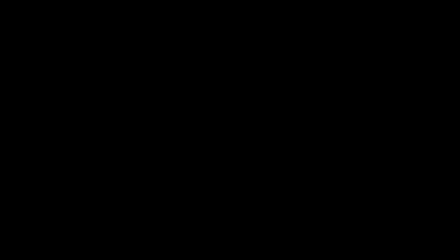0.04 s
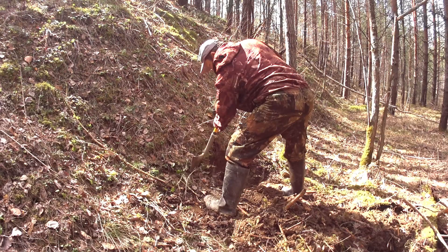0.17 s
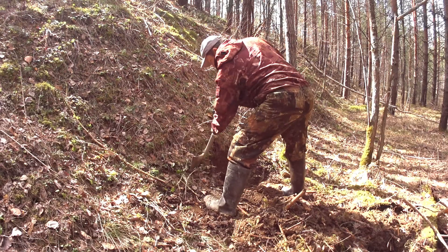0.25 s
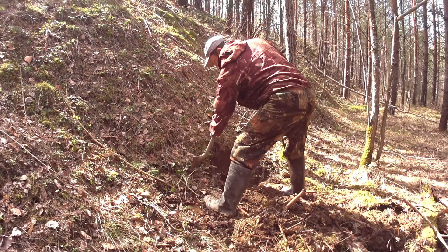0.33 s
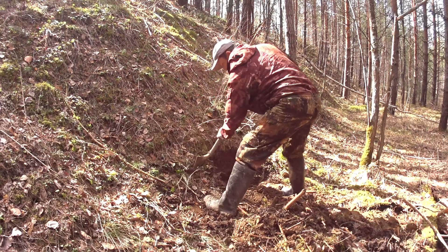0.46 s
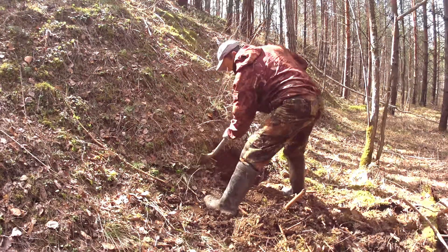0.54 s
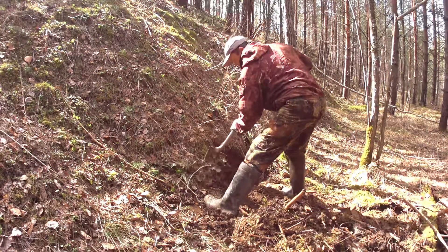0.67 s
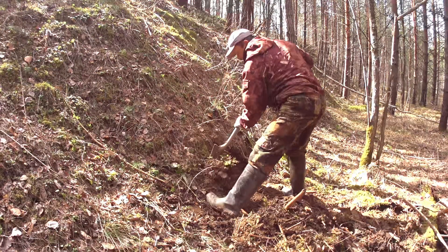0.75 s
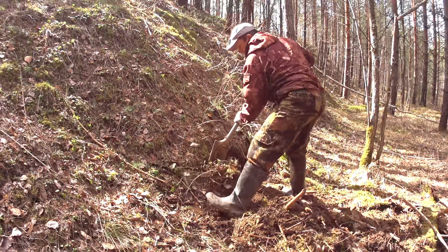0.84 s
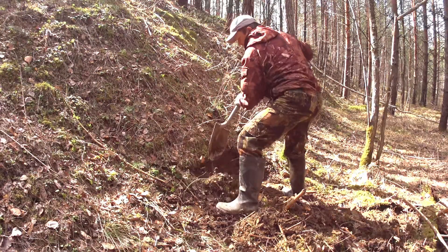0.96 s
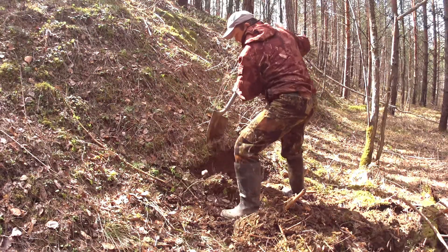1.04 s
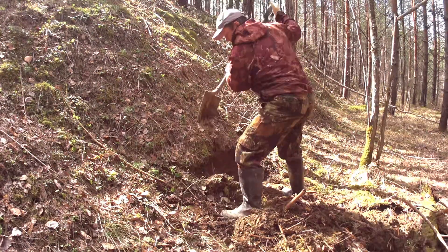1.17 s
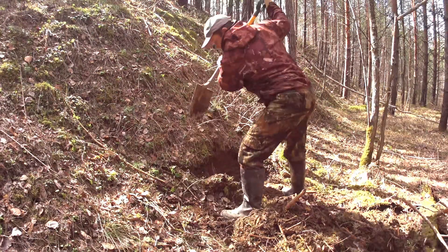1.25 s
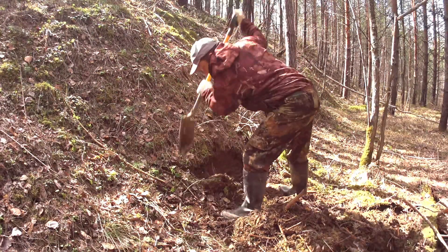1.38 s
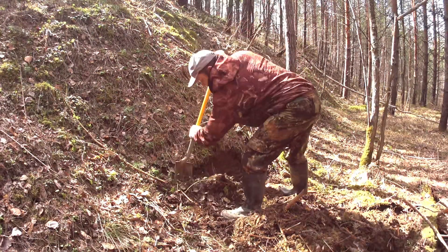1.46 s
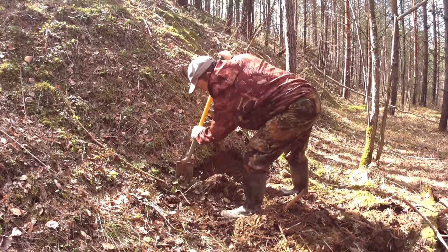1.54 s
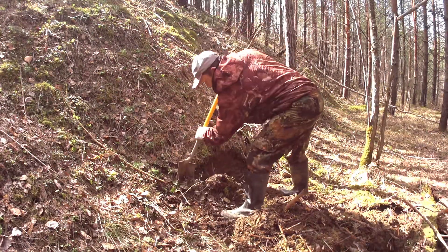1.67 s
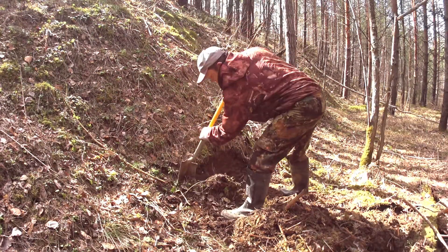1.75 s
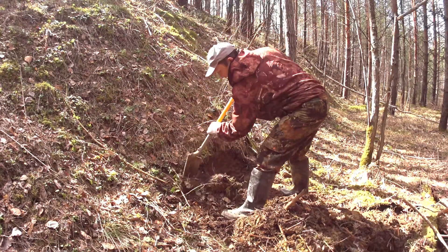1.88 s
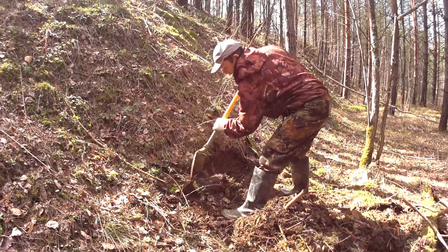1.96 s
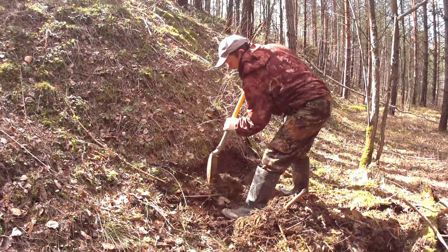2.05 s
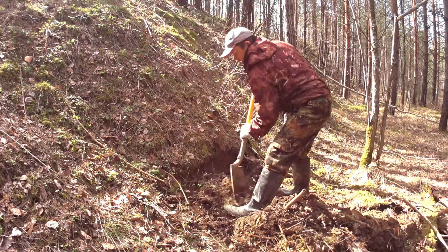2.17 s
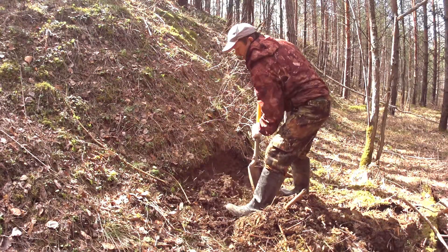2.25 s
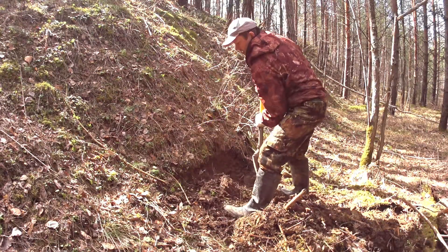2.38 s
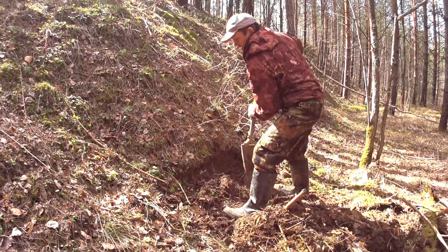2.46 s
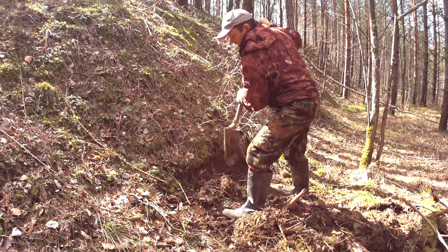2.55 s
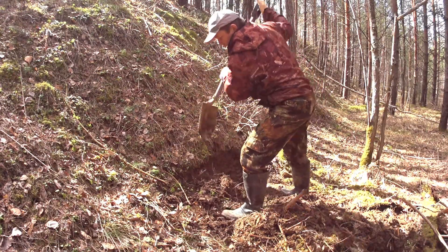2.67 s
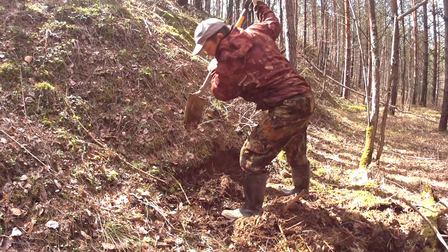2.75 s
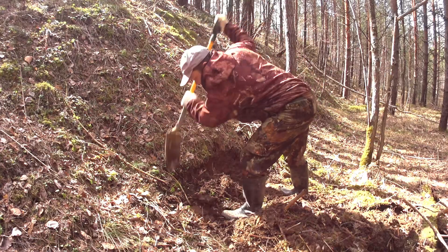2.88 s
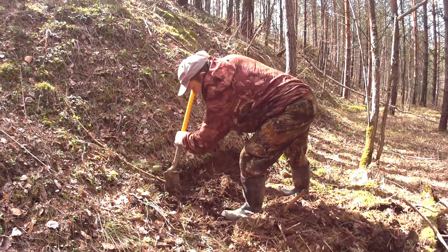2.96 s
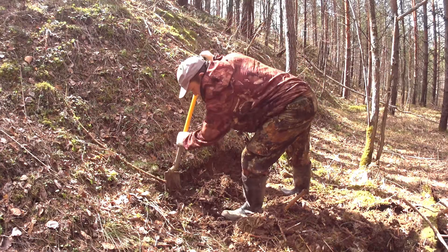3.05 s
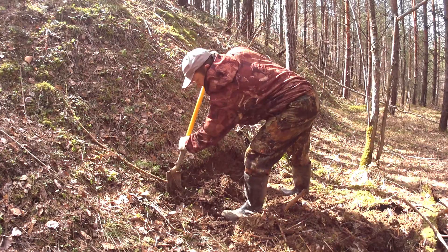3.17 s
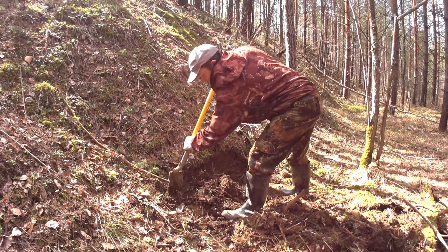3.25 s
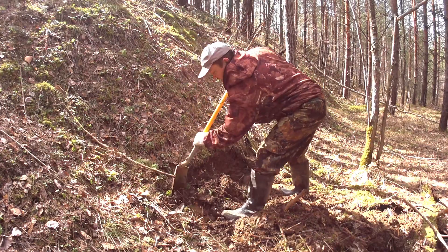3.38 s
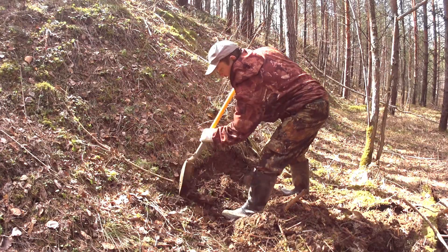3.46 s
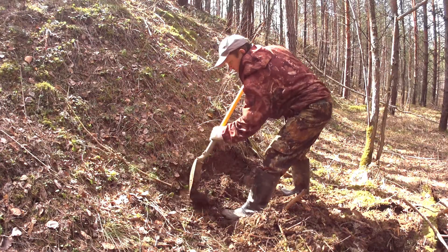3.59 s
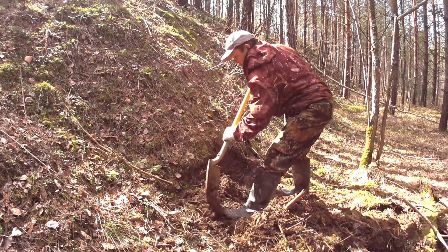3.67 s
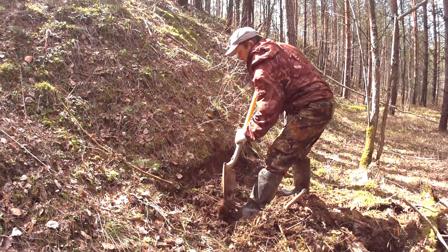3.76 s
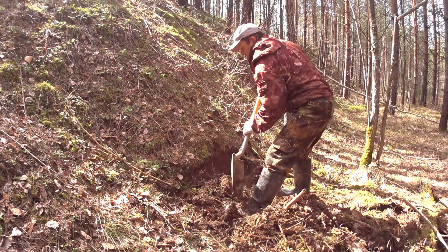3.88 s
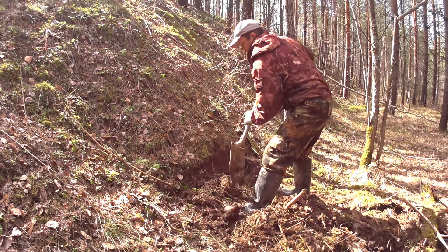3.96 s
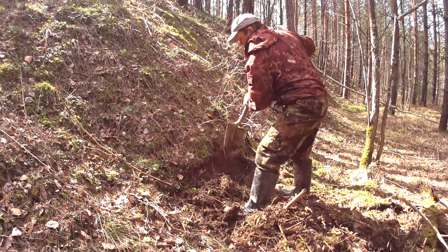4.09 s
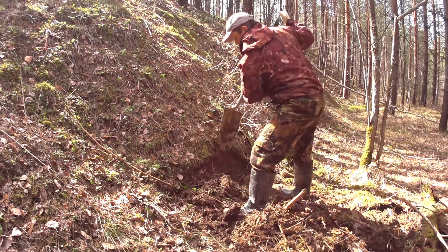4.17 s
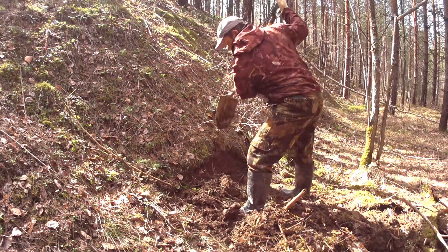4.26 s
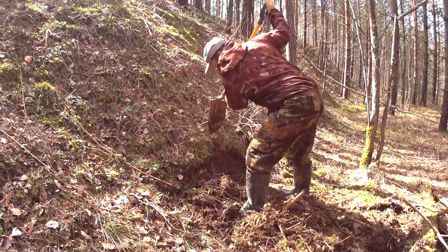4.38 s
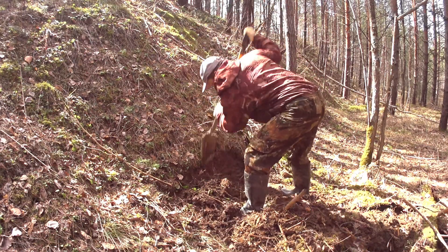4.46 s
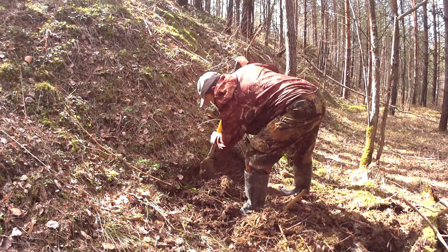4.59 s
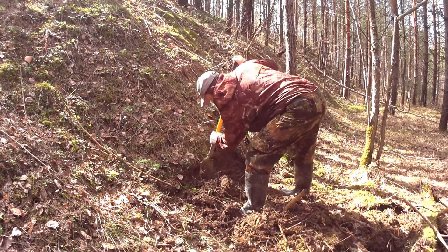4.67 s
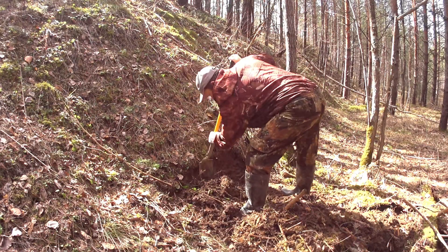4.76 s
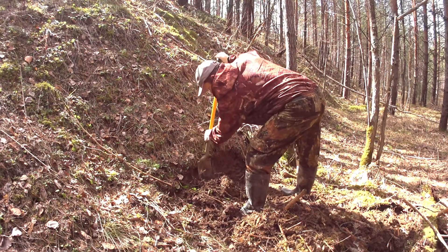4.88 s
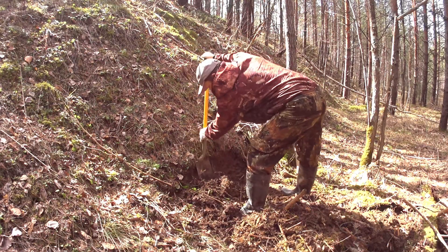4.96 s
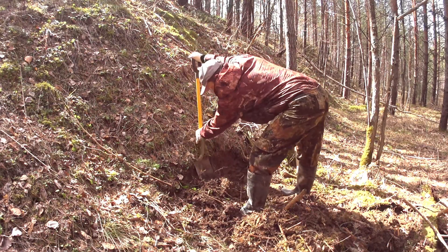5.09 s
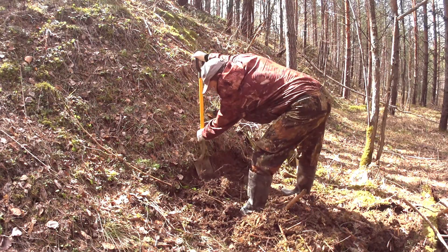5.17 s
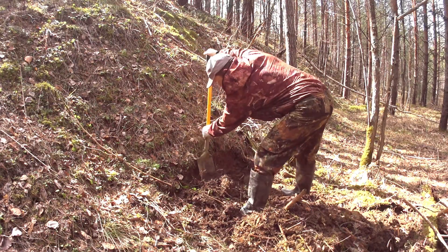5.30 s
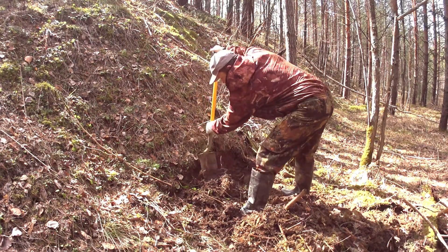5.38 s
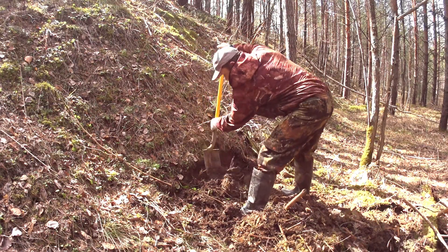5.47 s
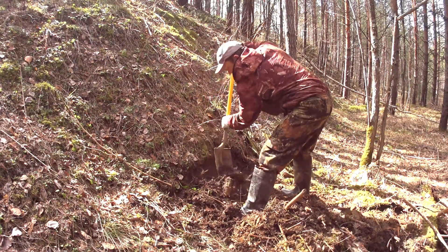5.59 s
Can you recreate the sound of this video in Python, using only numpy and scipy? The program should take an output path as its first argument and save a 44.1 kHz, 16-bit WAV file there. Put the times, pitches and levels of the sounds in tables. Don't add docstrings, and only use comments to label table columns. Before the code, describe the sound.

Three crunching, cracking shovel blows in clay soil, slightly ringing steel, trickling dirt and knocking stones, then a faint distant bird trill.

```python
import sys
import numpy as np
from scipy import signal
from scipy.fft import rfft, irfft
from scipy.io import wavfile

SR = 44100
rng = np.random.default_rng(int(sys.argv[2]) if len(sys.argv) > 2 else 0)


def convert_level_to_amplitude(level_db):
    exponent = np.asarray(level_db, float) / 20
    return 10 ** exponent


def master_out(mix):
    frames = np.transpose(np.atleast_2d(mix))
    ceiling = np.clip(frames, -1, 1)
    pcm = np.round(ceiling * 32767).astype(np.int16)
    wavfile.write(sys.argv[1], SR, pcm)


N = 248283

# (time [s], force [dB], depth [dB]); depth darkens the crunch
CHOPS = [
    [(1.385, -47, -7.5), (1.408, -27.5, 3), (1.4175, -24.5, 0), (1.4205, -19, 0.5), (1.434, -22.5, 1.5),
     (1.442, -32.5, 1.5), (1.47, -57.5, -13)],
    [(2.877, -29.5, -1), (2.893, -28, -2.5), (2.9, -25, -4), (2.905, -19, 7), (2.917, -20, 5.5),
     (2.928, -34.5, -2), (2.95, -42, 0)],
    [(4.463, -47, 7), (4.4695, -35, -5), (4.4705, -15.5, -5.5), (4.48, -25.5, -0.5), (4.492, -27.5, 2),
     (4.5, -40, 3), (4.53, -58, 3)],
]
# (frequency [Hz], level [dB per Hz])
SOIL_SPECTRUM = [(35, -92), (60, -41.5), (261, -31.5), (362, -19), (481, -18.5), (714, -18), (1440, -10.5),
                 (2180, -11), (3950, 3), (5730, -10), (10600, -17.5), (11300, -17), (14700, -74),
                 (22000, -120)]


def rms_one(x):
    return x / np.sqrt(np.mean(x ** 2) + 1e-20)


def peak_one(x):
    return x / np.abs(x).max()


def filtered(x, order, hz, kind):
    return signal.sosfilt(signal.butter(order, hz, kind, fs=SR, output="sos"), x)


def in_time(rows):
    s, *columns = np.transpose(rows)
    return [np.interp(np.arange(N) / SR, s, c) for c in columns]


def colour(x, spectrum):
    hz, db = np.transpose(spectrum)
    bin_hz = np.arange(1025) * SR / 2048
    gain_db = np.interp(np.log(bin_hz + 1), np.log(hz), np.maximum(db, -70))
    cepstrum = irfft(np.log(convert_level_to_amplitude(gain_db)))
    cepstrum[1:1024] *= 2
    cepstrum[1025:] = 0
    impulse = irfft(np.exp(rfft(cepstrum)))
    return signal.fftconvolve(x, impulse[None], axes=1)[:, :N]


def drift(rate_hz):
    r = np.exp(-2 * np.pi * rate_hz / SR)
    slow = signal.lfilter([1], [1, -2 * r, r * r], rng.standard_normal(N + 9000))
    return rms_one(slow[9000:])


def ring(clicks, hz, t60_s):
    r, w = convert_level_to_amplitude(-60 / (t60_s * SR)), 2 * np.pi * hz / SR
    return signal.lfilter([0, np.sin(w)], [1, -2 * r * np.cos(w), r * r], clicks + 1e-18)


def add(out, s, sound):
    i = round(s * SR)
    out[i:i + len(sound)] += sound[:N - i]


def widen(mono, twin):
    side_db = -15.5
    return mono + convert_level_to_amplitude(side_db) * twin * np.array([[1], [-1]])


def trunks(x, t60_s):
    t = np.arange(SR // 2) / SR
    tail = rng.standard_normal((2, len(t))) * convert_level_to_amplitude(-60 * t / t60_s) * (1 - np.exp(-t / 0.0011))
    tail = tail[0] + .5 * tail[1] * np.array([[1], [-1]])
    tail = tail / np.sqrt(np.sum(tail[0] ** 2))
    return signal.fftconvolve(x[None], tail, axes=1)[:, :N]


def woods():
    # (frequency [Hz], level [dB per Hz])
    woods_spectrum = [(12, -76), (20, -32), (154, -19), (223, -11.5), (422, -4), (596, -3.5), (717, -4),
                      (819, -5), (1390, -9.5), (1670, -9.5), (2070, -9.5), (3080, -17), (11300, -21.5),
                      (14700, -49), (22000, -120)]
    level_db, likeness = -60, 0.057
    mid, side = rms_one(colour(rng.standard_normal((2, N)), woods_spectrum))
    pair = np.sqrt(1 + likeness) * mid + np.sqrt(1 - likeness) * side * [[1], [-1]]
    return convert_level_to_amplitude(level_db - 5.0 + 1.16 * drift(11.8)) * pair


def whistle(pitch_hz):
    return np.hanning(len(pitch_hz)) ** .5 * np.sin(2 * np.pi * np.cumsum(pitch_hz) / SR)


def bird():
    # (time [s], level [dB], warble depth [Hz]); the note sags as deep as it warbles
    syllables = [
        (4.52, -56.5, 79.5),
        (4.64, -55, 102),
        (4.725, -47.5, 380),
        (4.915, -45.5, 380),
        (5.105, -44.5, 380),
        (5.295, -43.5, 380),
        (5.485, -40.5, 380),
    ]
    note_s, slur_s, slur_db = 0.165, .08, -14
    note_hz, warble_rate_hz, sag_per_s = 3900, 61.0, 5.0
    out, t, wobble = np.zeros(N), np.arange(round(note_s * SR)) / SR, drift(85.0)
    slur_len = round(slur_s * SR)
    for s, db, depth_hz in syllables:
        uneven = .3 * wobble[round(s * SR / 2):][:len(t)]
        slur_hz = np.linspace(5200., 4200., slur_len) + depth_hz * uneven[:slur_len]
        add(out, s, convert_level_to_amplitude(db + slur_db) * whistle(slur_hz))
        warble = np.sin(2 * np.pi * warble_rate_hz * t) + uneven - sag_per_s * t
        add(out, s + 0.037, convert_level_to_amplitude(db) * whistle(note_hz + depth_hz * warble))
    return trunks(out, .42)


def swishes():
    # (time [s], length [s], level [dB])
    strokes = [
        (0.408, 0.35, -52.5),
        (3.798, 0.2, -50.5),
    ]
    # (frequency [Hz], level [dB per Hz])
    cloth_spectrum = [(880, -62), (1500, -32), (2130, -8), (2320, -7), (2820, -11), (4650, -1),
                      (7750, -23.5), (9000, -26), (11700, -64), (19800, -120)]
    t = np.arange(N) / SR
    swell = sum(convert_level_to_amplitude(db) * np.sin(np.pi * np.clip((t - s) / length_s, 0, 1)) ** 0.59
                for s, length_s, db in strokes)
    return widen(*(swell * rms_one(colour(rng.standard_normal((2, N)), cloth_spectrum))))


def thuds():
    # (time [s], peak [dB], pitch [Hz], t60 [s])
    footfalls = [
        (.343, -42.5, 203, 0.045),
        (1.372, -45.5, 221, .031),
        (1.418, -27.5, 431, 0.055),
        (2.704, -46, 220, 0.032),
        (2.904, -28.5, 500, .059),
        (3.685, -36, 536, 0.061),
        (3.729, -40, 500, 0.041),
        (3.827, -43.5, 360, 0.039),
        (4.391, -43.5, 228, 0.043),
        (4.48, -42, 530, 0.11),
    ]
    out, t = np.zeros(N), np.arange(6000) / SR
    for (s, db, hz, t60_s), puff in zip(footfalls, rng.standard_normal((len(footfalls), 6000))):
        push = np.exp(-t / 0.00078) + 0.94 * puff * np.exp(-t / 0.003)
        upper = 0.4 * ring(push, 1.7 * hz, .25 * t60_s)
        lower = 0.3 * ring(push, 0.575 * hz, 0.57 * t60_s)
        add(out, s, convert_level_to_amplitude(db) * peak_one(np.diff(ring(push, hz, t60_s) + upper + lower)))
    return filtered(out, 3, 140, "high")


def burst_shape(t, contact_s):
    return t / contact_s * np.exp(1 - t / contact_s)


def snaps(rows, contact_s):
    # (pitch [Hz], t60 [s])
    lump_decay = [(1200, 0.016), (4200, 0.0091), (7500, 0.0039)]
    pitched, sharp, t = np.zeros((2, N)), np.zeros((2, N)), np.arange(2000) / SR
    for (s, db, hz, sharp_db), bursts in zip(rows, rng.standard_normal((len(rows), 2, 2000))):
        t60_s = np.clip(np.interp(hz, *np.transpose(lump_decay)), .0015, .016)
        for k, burst in enumerate(bursts * burst_shape(t, contact_s)):
            add(pitched[k], s + 0.0006, convert_level_to_amplitude(db) * peak_one(ring(np.diff(burst), hz, t60_s)))
            add(sharp[k], s + 0.00064, convert_level_to_amplitude(db + sharp_db) * peak_one(burst))
    return widen(*(pitched + convert_level_to_amplitude(10.5) * colour(sharp, SOIL_SPECTRUM)))


def scattered(rows, hz, sharp_db):
    chance = rng.standard_normal((len(rows), 2))
    return [(s, db, hz * (1 + .06 * a), sharp_db + 3.2 * b) for (s, db), (a, b) in zip(rows, chance)]


def leaves():
    # (time [s], peak [dB])
    leaf_ticks = [(.1433, -52), (.4536, -49), (.9076, -49), (.934, -45.5), (1.0747, -52), (1.2264, -47.5),
                  (3.0382, -50.5), (3.1245, -41), (3.1783, -41), (3.1983, -45), (3.3225, -40.5),
                  (3.5645, -45), (3.7281, -45), (4.0189, -56), (4.205, -50), (4.2733, -53), (4.4195, -49.5),
                  (4.947, -67), (4.9698, -58), (4.988, -53), (5.0262, -57), (5.4103, -61), (5.4343, -51)]
    return snaps(scattered(leaf_ticks, hz=7300, sharp_db=-13), contact_s=0.001)


def knocks():
    # (time [s], peak [dB], pitch [Hz], broad clack [dB])
    stones = [(1.156, -43, 1700, -5), (1.183, -33.5, 1770, -13), (1.546, -38, 2070, -22),
              (1.565, -50, 2140, -6), (2.032, -41.5, 1240, -4), (2.374, -45.5, 1950, 4),
              (2.705, -40.5, 660, -5), (2.804, -45.5, 1900, 7.5), (3.334, -47, 1840, -7),
              (3.376, -38, 1860, -3), (3.5, -43.5, 1230, -1), (3.661, -39, 1330, 6), (3.684, -43.5, 930, 2),
              (3.73, -40, 850, -4), (3.745, -44, 1610, 10), (3.825, -44.5, 830, 8), (3.86, -49.5, 2400, 0),
              (4.513, -29, 1220, -15), (4.716, -32.5, 1200, -13), (5.41, -38, 1330, -2.5)]
    out, t = np.zeros((2, N)), np.arange(3000) / SR
    for (s, db, hz, clack_db), bursts in zip(stones, rng.standard_normal((len(stones), 2, 3000))):
        for k, burst in enumerate(bursts * burst_shape(t, contact_s=0.0014)):
            ping = ring(burst, hz, .018)
            clack = np.diff(ring(burst, hz, .003) + ring(burst, 1.7 * hz, .002), prepend=0)
            add(out[k], s, convert_level_to_amplitude(db - 4.5) * (peak_one(ping) + convert_level_to_amplitude(clack_db) * peak_one(clack)))
    return widen(*filtered(out, 2, [450, 4500], "band"))


def soil(body_db, grit_db, dust_db, per_s, spread_db, clump_db, hiss_db):
    sizes = convert_level_to_amplitude(spread_db * np.minimum(rng.exponential(1, (2, N)), 5)) * rng.choice([-1, 1], (2, N))
    grains = rms_one(sizes * (rng.random((2, N)) < per_s / SR))
    grains = grains + convert_level_to_amplitude(hiss_db) * rng.standard_normal((2, N))
    grains = colour(grains * convert_level_to_amplitude(clump_db * drift(95.0)), SOIL_SPECTRUM)
    body = filtered(grains, 3, 2500, "low")
    grit = filtered(grains, 2, [2500, 5700], "band")
    dust = filtered(grains, 3, 5700, "high")
    zones = zip([body, grit, dust], [body_db, grit_db, dust_db], [1.5, 1.1, 1.1])
    return widen(*sum(rms_one(zone) * convert_level_to_amplitude(db + patch_db * drift(39.8)) for zone, db, patch_db in zones))


def flow():
    # (peak time [s], level [dB], swell [s], fade [s], coarseness [dB])
    slides = [(0.117, -51.5, 0.025, 0.18, -2), (.27, -54, 0.17, 0.1, -5.5), (.668, -37.5, 0.29, 0.18, 1.5),
              (0.852, -47, 0.59, 0.57, -2.5), (1.026, -47, 0.23, 0.13, 4), (1.225, -54.5, 0.035, 0.24, 2.5),
              (1.83, -47.5, .2, 0.23, 1.5), (1.997, -35, 0.15, .25, -1.5), (2.11, -42.5, 0.11, 0.26, 0),
              (2.3, -57, 0.18, 0.33, -3), (3.15, -55, 0.49, .5, -6), (3.3, -48, 0.39, 0.9, 1.5),
              (3.574, -46, .9, 0.23, 1), (3.745, -46, 0.13, 0.055, 3.5), (3.87, -46.5, 0.18, 0.13, 5.5),
              (4.43, -54, 0.37, 0.27, 0), (5.0, -51.5, 0.26, 0.17, -0.5), (5.5, -49.5, 0.49, 0.7, 2.5)]
    trickle_db = -66
    t = np.arange(N) / SR
    spills = [(c[-1][0], -54, .03, 0.62, 0) for c in CHOPS]
    rows = slides + spills
    power = np.array([convert_level_to_amplitude(2 * db - 43.4 * np.maximum((s - t) / swell_s, (t - s) / fade_s))
                      for s, db, swell_s, fade_s, _ in rows])
    total = power.sum(axis=0) + convert_level_to_amplitude(2 * trickle_db)
    coarse_db = np.array([row[-1] for row in rows]) @ power / total
    grit_db = 10 * np.log10(total)
    body_db = grit_db - 9 + coarse_db
    dust_db = grit_db - 10 + 0.16 * (grit_db + 45) - 0.56 * coarse_db
    return body_db, grit_db, dust_db


def crumbs(grit_db):
    when, size = rng.random((70, 2)).T
    at = (when * N * .97).astype(int)
    return list(zip(at / SR, grit_db[at] + 1.5 + 6.0 * size))


def lumps(grit_db):
    # (time [s], peak [dB], pitch [Hz])
    clod_hits = [(0.2042, -46, 3930), (.4746, -48, 4830), (.5624, -48, 4700), (0.6135, -41, 3950),
                 (0.6494, -26.5, 3940), (.6740, -37, 3760), (0.691, -32, 3500), (.7405, -43, 3500),
                 (.8722, -42, 4050), (1.0752, -41, 4000), (1.227, -38.5, 4000), (1.2759, -40, 3900),
                 (1.5195, -40, 4500), (1.5648, -39, 4300), (1.639, -42, 3590), (1.7951, -49, 4020),
                 (1.9904, -30, 4200), (2.0201, -31, 3800), (2.1099, -33, 4260), (2.8045, -35.5, 3980),
                 (2.9843, -34, 3240), (3.1244, -41, 4000), (3.1985, -40, 4160), (3.264, -39.5, 3670),
                 (3.3769, -35, 3380), (3.5822, -34, 3650), (3.7303, -44, 4100), (4.017, -43, 4600),
                 (4.2738, -45.5, 4000), (4.6231, -35.5, 4700)]
    sharp_db = -0.5
    clods = [(*clod, sharp_db) for clod in clod_hits]
    return snaps(clods + scattered(crumbs(grit_db), 4050, sharp_db), contact_s=0.00073)


def blade():
    # (time [s], level [dB], low mode [dB])
    releases = [
        (1.454, -44.5, -20),
        (2.928, -43, -25),
        (4.503, -42, 0),
        (4.482, -70, 48),
    ]
    # (frequency [Hz], level [dB], t60 [s])
    blade_modes = [(1195, -8, .1), (4487, 0, .32), (4519, -4, .24)]
    clicks = np.zeros((2, N))
    for s, db, low_db in releases:
        add(clicks[0], s, np.array([convert_level_to_amplitude(db)]))
        add(clicks[1], s, np.array([convert_level_to_amplitude(db + low_db)]))
    struck = sum(convert_level_to_amplitude(db) * ring(clicks[int(hz < 2000)], hz, t60_s) for hz, db, t60_s in blade_modes)
    return convert_level_to_amplitude(2.0 * drift(70.0)) * filtered(struck, 2, 900, "high")


def cracks():
    # (time [s], peak [dB], pitch [Hz], sharp share [dB])
    clay_cracks = [(1.4096, -22.5, 3420, -6), (1.4098, -26, 7500, -30), (1.419, -17.5, 4100, -11),
                   (1.4195, -24, 1450, -8), (1.425, -18.5, 4530, -20), (1.4315, -16, 4220, -12),
                   (1.4318, -22.5, 7300, -20), (1.436, -27, 1590, -4), (2.8768, -27, 3380, 1),
                   (2.8875, -33, 4330, -6), (2.895, -15, 4170, -4), (2.8948, -17.5, 8070, -10),
                   (2.9028, -18, 4370, -11), (2.9051, -10, 3930, -1), (2.9056, -19, 900, -7),
                   (2.9097, -10, 1186, -1), (2.917, -14, 3980, -22), (2.9175, -18.5, 1300, -10),
                   (2.923, -23, 1070, -10), (4.4692, -19.5, 7500, 3.5), (4.4694, -10.5, 4880, 0.5),
                   (4.4725, -16.5, 4550, -10), (4.4785, -13.5, 3840, -11), (4.481, -9, 1254, -17),
                   (4.488, -21.5, 1170, -15), (4.49, -26, 1890, -15)]
    return snaps(clay_cracks, contact_s=0.00041)


def chops():
    gated = [[(c[0][0] - .004, -90, 0), *c, (c[-1][0] + 0.071, -80, 0)] for c in CHOPS]
    force_db, depth_db = in_time(sum(gated, []))
    return soil(force_db - 6 + depth_db, force_db, force_db - 13.5 - depth_db,
                per_s=6100.0, spread_db=3.0, clump_db=1.0, hiss_db=8.5)


def scene():
    low_cut_hz, ground_db, echo_db = 146, -26, -22.5
    sliding_db = flow()
    crumble = soil(*sliding_db, per_s=2500.0, spread_db=4.5, clump_db=1.2, hiss_db=2.0)
    hits = chops() + cracks() + lumps(sliding_db[1]) + leaves() + knocks() + blade()
    hits = filtered(hits, 2, low_cut_hz, "high") + convert_level_to_amplitude(ground_db) * hits + thuds()
    echo = convert_level_to_amplitude(echo_db) * trunks(hits.mean(axis=0), 0.35)
    return crumble + swishes() + hits + echo + bird() + woods()


def top_cut(x):
    return signal.sosfilt(signal.butter(12, 12360, fs=SR, output="sos"), x)


def record(dry):
    fade_s, silence_s, resume_s, opening_db, top_hz = 0.066, 0.093, .111, -2, 11400
    gate = np.interp(np.arange(N) / SR, [fade_s, silence_s, resume_s - .001, resume_s],
                     [convert_level_to_amplitude(opening_db), 0, 0, 1])
    cut = signal.sosfilt(signal.cheby2(10, 45, top_hz + 500, fs=SR, output="sos"), dry)
    return top_cut(cut * gate * convert_level_to_amplitude(np.array([[.15], [-.15]])))


dry = scene()
out = record(dry)
master_out(out)
```